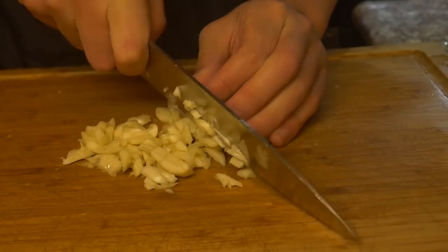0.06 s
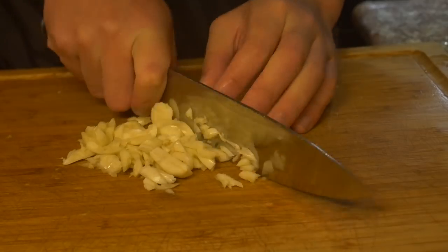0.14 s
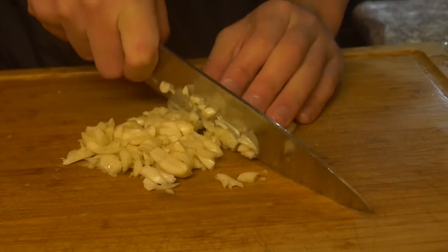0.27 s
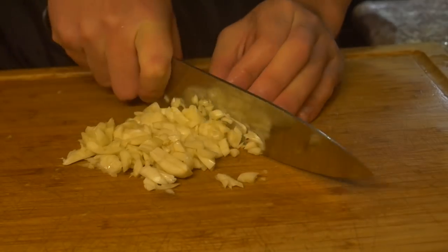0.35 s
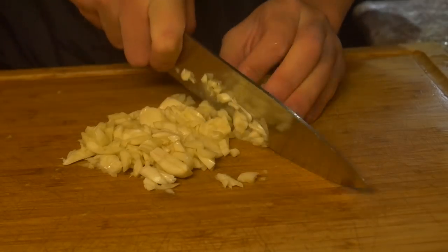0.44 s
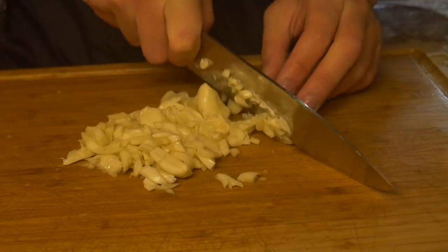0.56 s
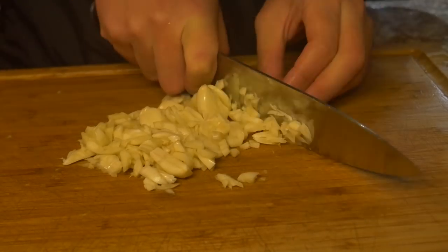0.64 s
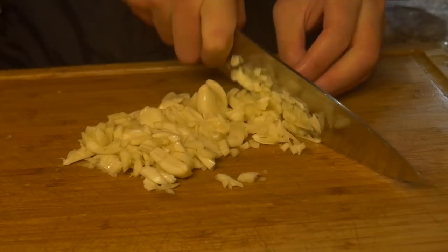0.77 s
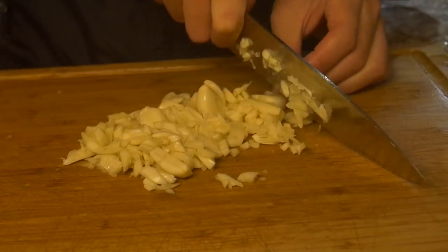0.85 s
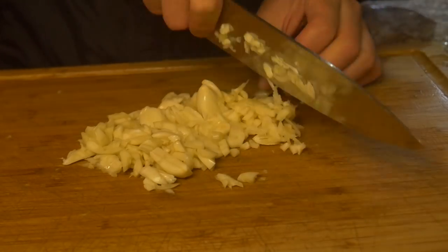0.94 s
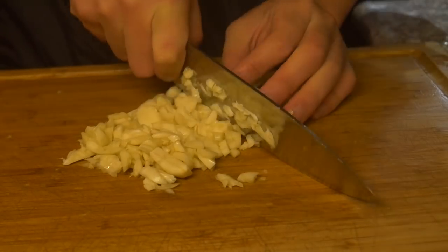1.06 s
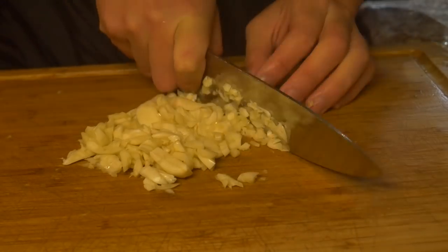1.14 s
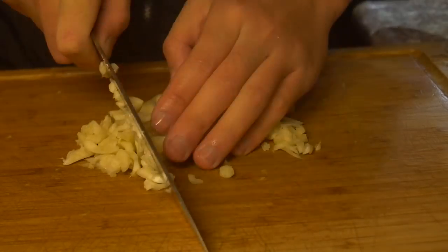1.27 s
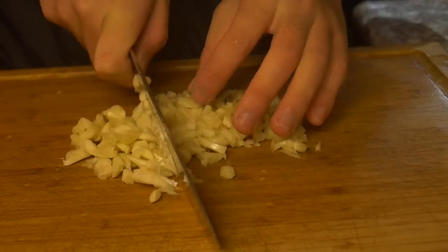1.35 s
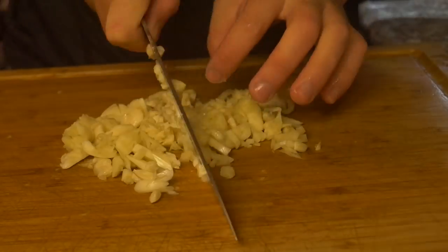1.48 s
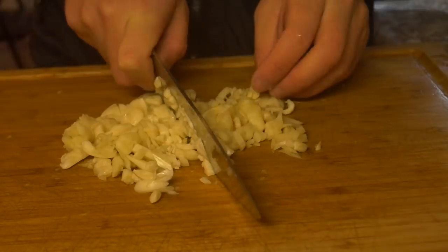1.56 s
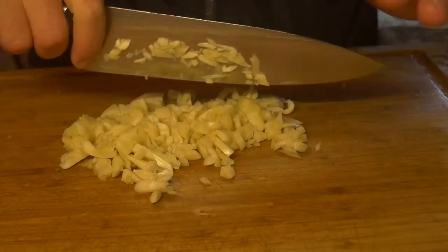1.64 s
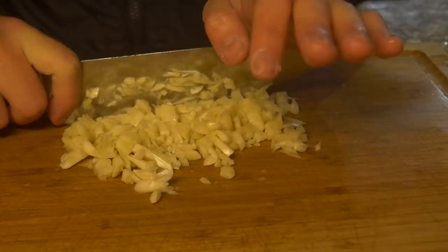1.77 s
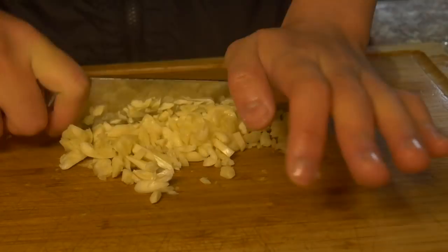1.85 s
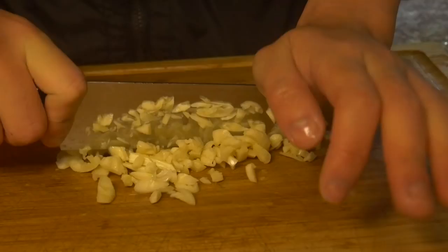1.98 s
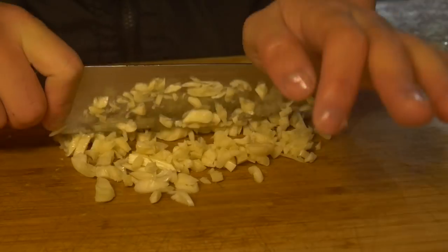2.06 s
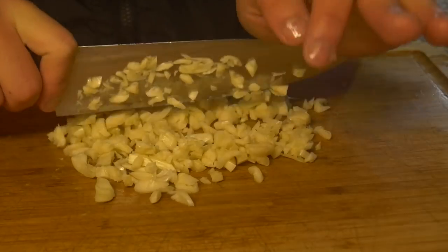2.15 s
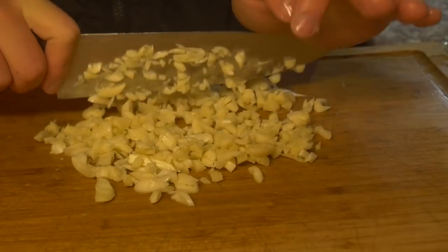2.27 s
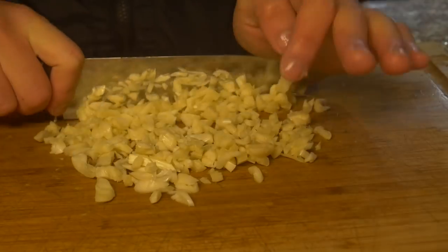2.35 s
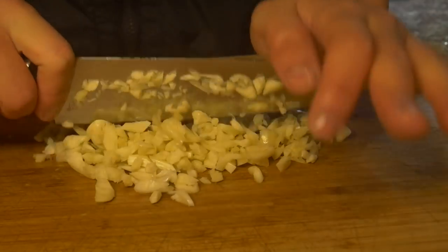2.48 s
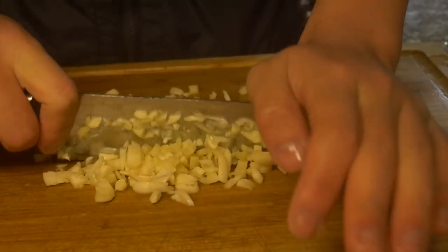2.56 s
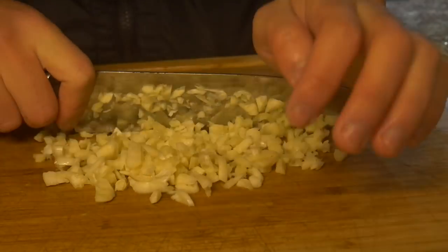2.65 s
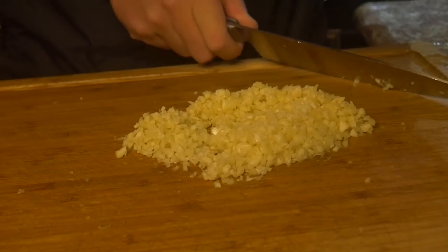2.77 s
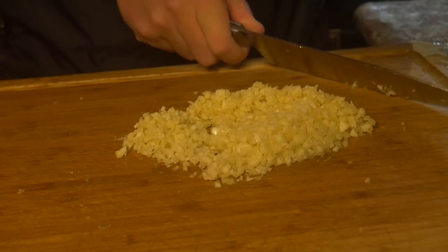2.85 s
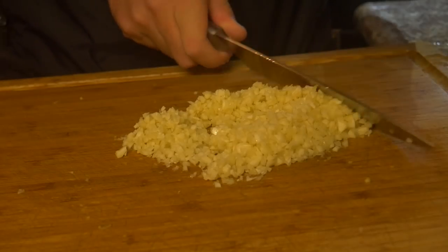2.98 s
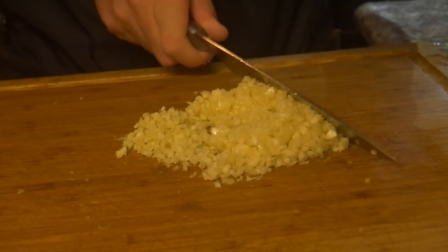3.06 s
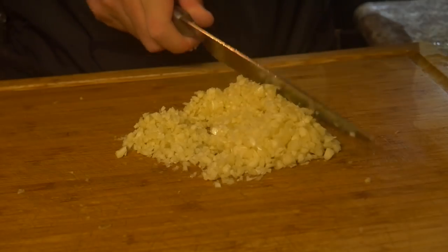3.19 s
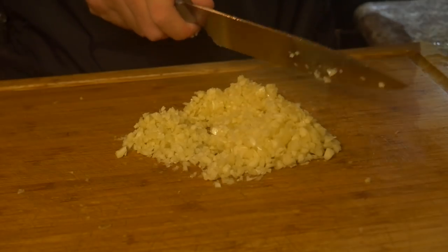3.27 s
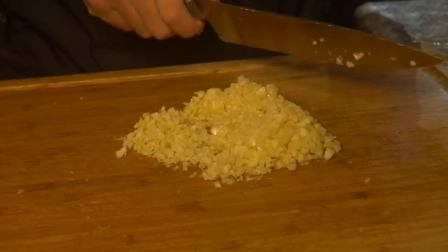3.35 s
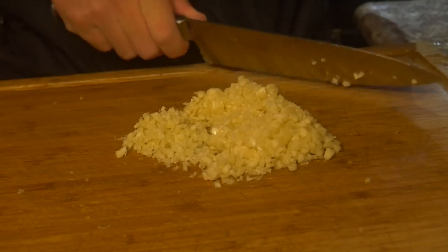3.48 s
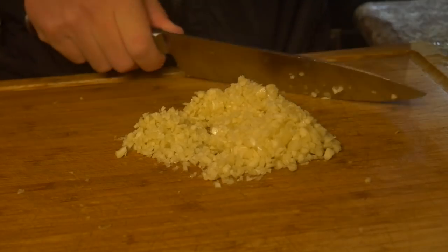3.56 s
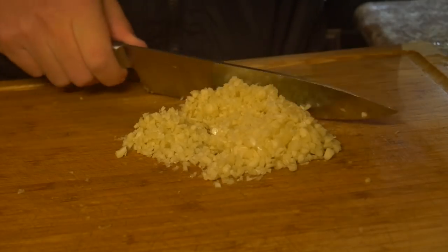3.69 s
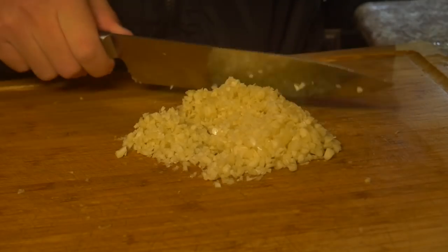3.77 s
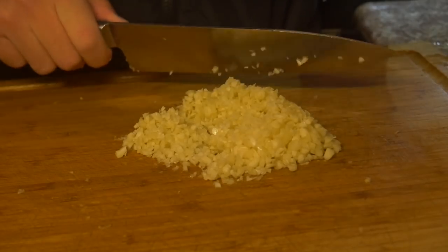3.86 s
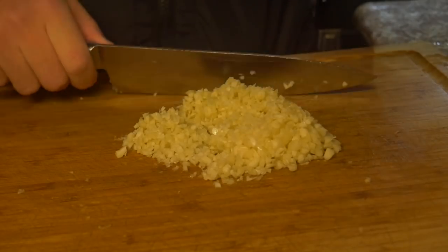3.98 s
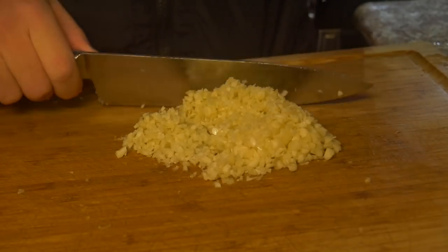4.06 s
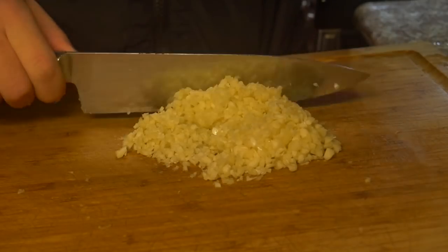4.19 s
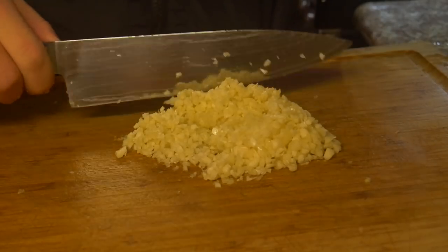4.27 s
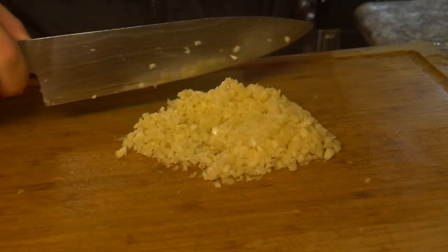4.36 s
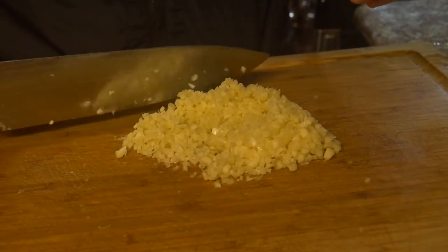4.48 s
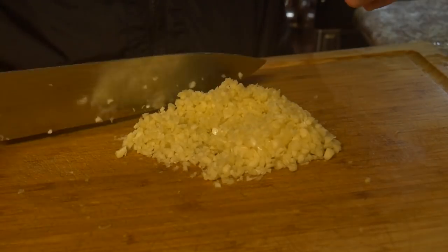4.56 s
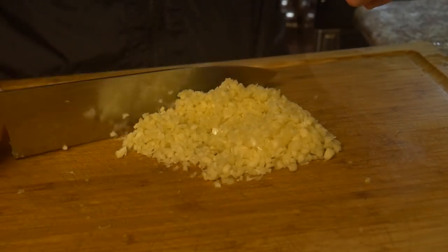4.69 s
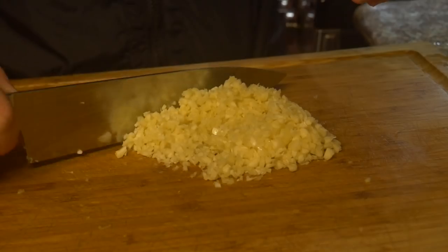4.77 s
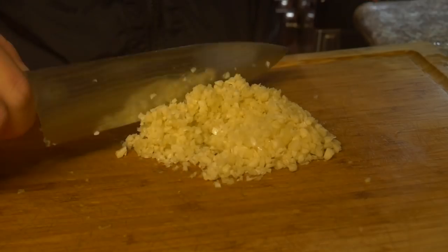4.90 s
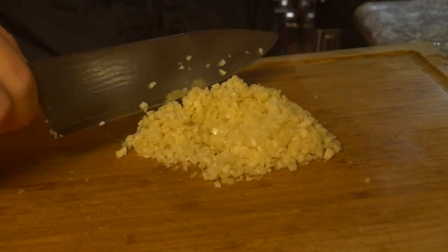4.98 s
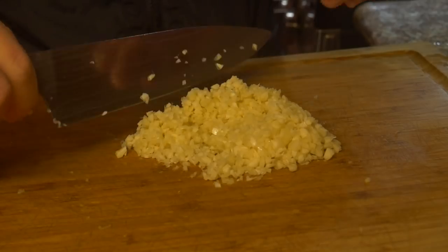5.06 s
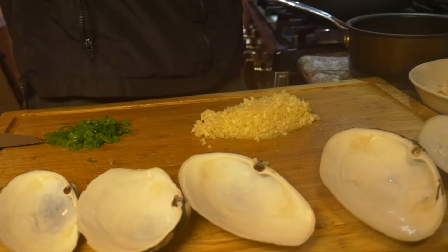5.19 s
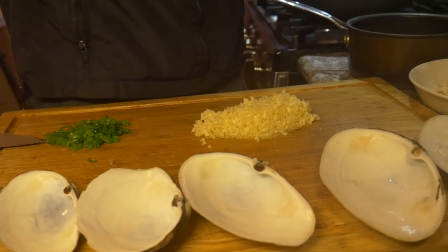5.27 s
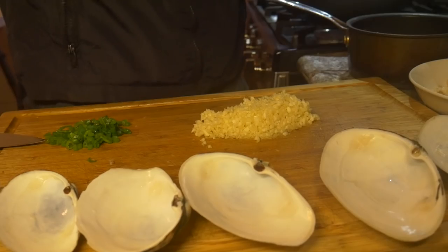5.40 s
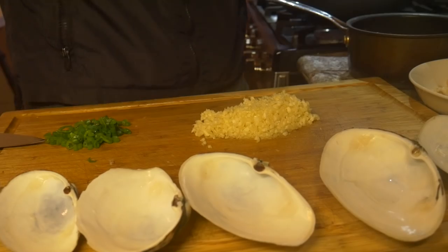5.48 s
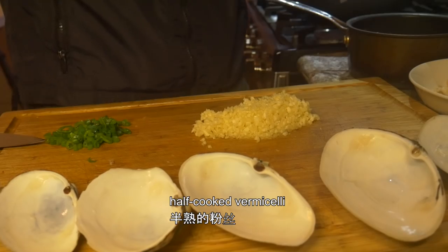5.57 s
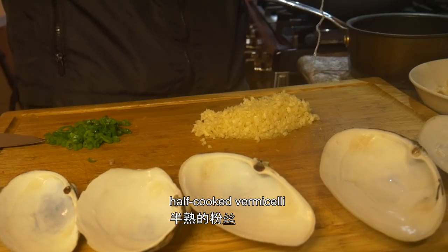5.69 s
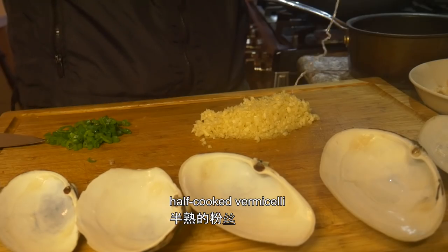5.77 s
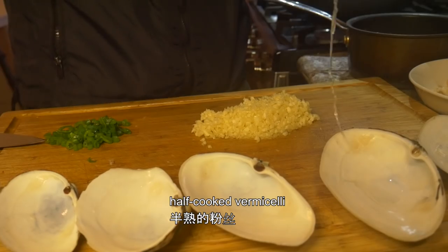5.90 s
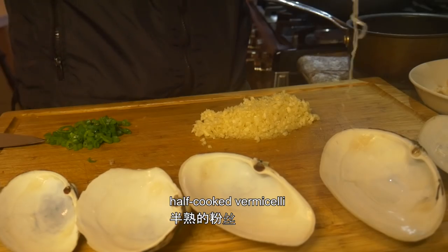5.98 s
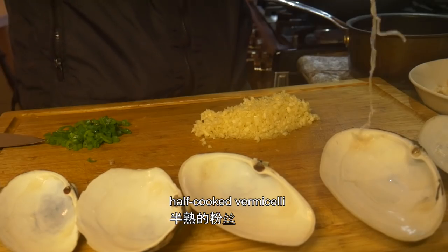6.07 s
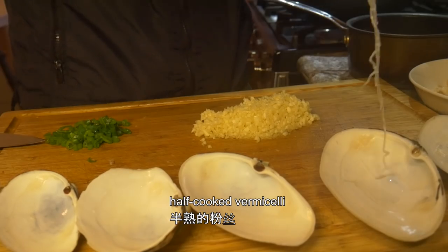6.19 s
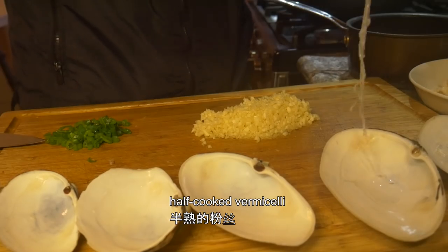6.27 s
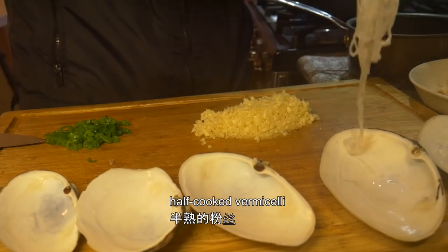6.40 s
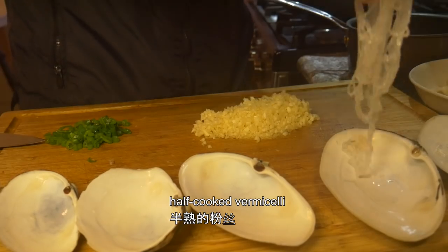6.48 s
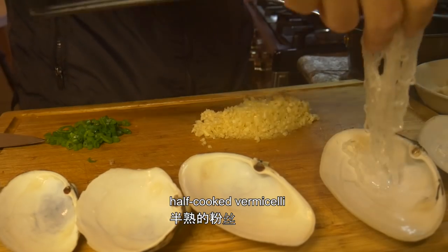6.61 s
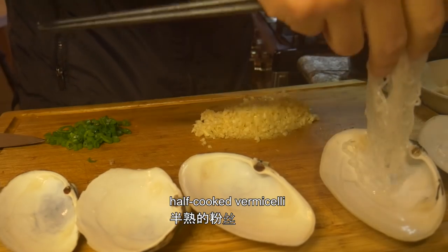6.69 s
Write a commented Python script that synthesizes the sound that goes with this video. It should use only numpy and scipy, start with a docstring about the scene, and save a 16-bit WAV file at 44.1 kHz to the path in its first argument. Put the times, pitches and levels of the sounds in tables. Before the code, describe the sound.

From 0 to 2.7 seconds, a knife chops garlic on a wooden board, greatly sped up: hard, bright, chirpy knocks about twenty a second, each with a crisp crunch and pitched far above normal, over hissy air and raised appliance hum. The run is fairly regular until 1.6, pauses briefly, then from 1.75 becomes denser, sharper and more uneven, some blows clipping. At 2.8 the sound drops to natural speed: a woody, hollow slap of the flat blade, then a gritty scrape with a metallic hum to about 3.15. A short scrape rasps at 3.65, a knock with a brief scrape comes at 4.05, and another knock at 4.72 with a faint gritty tail. Low rumble and hum sit beneath. From 5.2 the kitchen is quieter, with soft airy noise, faint swishes and barely audible dull touches near 6.25 and 6.4. Close, dry, nearly mono.

```python
"""In a kitchen, close by, a chef's knife minces garlic on a wooden board, played back eight times too fast:
every resonance sits three octaves up. Then, at natural speed, the blade taps the board and scrapes the
heap together; last comes a quieter kitchen with soft touches. Blows ring the modes of board and counter,
crunch and scrapes are random clicks through resonances, and the air is shaped noise with appliance hum."""
import sys
import numpy as np
from scipy import signal
from scipy.fft import rfft, irfft
from scipy.io import wavfile

SR = 44100
rng = np.random.default_rng(int(sys.argv[2]) if len(sys.argv) > 2 else 0)


def dump(signal):
    """Clip the signal to [-1, 1] and save it as 16-bit WAV at the path in sys.argv[1]."""
    limited = np.clip(np.atleast_2d(signal).T, -1, 1)
    pcm = np.round(limited * 32767).astype(np.int16)
    wavfile.write(sys.argv[1], SR, pcm)


N = 297234

SPEED = 8             # playback speed of the chopping
CUTOFF_HZ = 16100     # top of what is heard
THUMP_LAG_S = 0.0045  # natural speed: the counter swings up only after the blow

# ring of the board at natural speed: mode_hz, edge_blow_db, flat_blow_db, t60_s
BOARD_MODES = [(440, -1.5, -3, .08), (463, -8, -1, .115), (470, -18, -24, .38), (545, -10, -10, .06),
               (269, -8, -9, .12), (635, -8, -14, .06), (735, -12, -11, .08), (915, -16, -18, .06),
               (1140, -16, -24, .04), (1420, -18, -26, .03), (415, -6, -30, .06)]
# knock of the board on its feet, natural speed: mode_hz, edge_blow_db, flat_blow_db, t60_s
FEET_MODES = [(59.8, -6, -24.5, 0.12), (127.7, -5, -19, 0.3), (78.5, 5.5, -42, 0.18),
              (238, 10.5, -41, 0.046)]
# shape of the air noise up to 3 s, also of the chops' rumble: frequency_hz, level_db (per Hz)
FIRST_AIR_SHAPE = [(30, -13), (75, 4), (100, -5), (140, 9.5), (205, -16.5), (260, 9.5), (340, 0),
                   (480, -2.5), (600, -3), (1130, 0), (1700, 6), (3580, 3.5), (8300, -6), (16000, -10.5)]
# shape of the air noise from 3 s to 5.22 s, also of the taps' rumble: frequency_hz, level_db (per Hz)
SECOND_AIR_SHAPE = [(18, -42), (30, 16), (86, 13), (118, 10.5), (221, 7.5), (311, 12.5), (461, 0.5),
                    (540, -6), (702, -14), (760, -18), (988, -19.5), (1590, -31.5), (1910, -31.5),
                    (11400, -46), (16000, -50)]


def chops():
    """Garlic crunches under the falling edge, the edge hits, board and counter answer."""
    # fast chops; weight goes into board and counter: start_s, blow_db, blow_hz, crunch_db, weight_db
    chop_table = [(.001, -40, 3000, -42, -35), (0.0488, -13.5, 3480, -26.5, -29),
                  (0.1019, -15.5, 2780, -26, -29), (0.154, -16, 4520, -21.5, -30.5),
                  (0.208, -3, 3000, -25, -27.5), (0.2583, -4.5, 3580, -14.5, -28.5),
                  (0.3082, -5, 3400, -15.5, -28), (0.36, -6, 3320, -21, -28.5),
                  (.4087, -6.5, 2540, -17.5, -26.5), (0.4553, -13, 3400, -17.5, -28),
                  (0.5075, -7, 2570, -19, -28), (.5498, -26, 4070, -34, -48),
                  (0.561, -17.5, 2850, -22.5, -28.5), (0.6095, -3, 3300, -20.5, -27),
                  (0.6637, -9.5, 2150, -27, -27.5), (0.7082, -3, 2970, -25, -28),
                  (.751, -14, 4570, -23.5, -31.5), (0.795, -9.5, 1900, -27.5, -28),
                  (0.8401, -7, 2410, -27.5, -27.5), (.8866, -4, 3020, -26.5, -30),
                  (0.9288, -15, 4620, -21.5, -32.5), (0.9711, -6.5, 3080, -25, -30),
                  (1.025, 1.5, 5750, -28, -43), (1.0671, -3, 2740, -18.5, -28.5),
                  (1.115, -9, 2700, -25, -29.5), (1.161, -3.5, 3260, -19.5, -28),
                  (1.21, -2.5, 3300, -21.5, -29.5), (1.2726, -8, 4060, -48, -53.5),
                  (1.3319, -3.5, 5460, -25.5, -41), (1.383, -5.5, 4450, -25, -27.5),
                  (1.422, -21, 4750, -26.5, -35.5), (1.464, -14, 4700, -23, -32),
                  (1.5074, -4.5, 3530, -23, -27.5), (1.569, -13, 4900, -31.5, -40),
                  (1.6134, 1, 3780, -20.5, -30), (1.7492, -10, 3760, -29, -37),
                  (1.7627, -2.5, 2300, -19, -25), (1.7762, -5.5, 3450, -35, -61),
                  (1.7963, -6, 4990, -12, -57), (1.8181, -0.5, 2900, -31, -25),
                  (1.8594, 2.5, 4370, -26, -32), (1.8882, -1, 2400, -21, -28.5),
                  (1.9013, -6, 3140, -15, -58), (1.9163, -7, 4300, -20, -34.5),
                  (1.941, -0.5, 2500, -24, -23), (1.9536, -5.5, 3360, -38, -67.5),
                  (1.973, -8, 3760, -25, -38), (2.0328, 1, 4700, -22, -26), (2.0624, -6.5, 3900, -28, -29),
                  (2.0925, -23.5, 2780, -25, -35), (2.117, 0, 3760, -17.5, -24),
                  (2.1457, -18, 2810, -28, -36.5), (2.1727, -1, 4200, -20, -30),
                  (2.201, 1.5, 4700, -27, -28.5), (2.2315, -10.5, 4380, -21, -32),
                  (2.2604, -4.5, 4240, -21.5, -33.5), (2.2907, -8.5, 3360, -21, -27.5),
                  (2.318, -23, 5370, -22, -60), (2.3704, -6.5, 5000, -15, -37),
                  (2.3937, -19.5, 2710, -25, -29.5), (2.4151, 0, 5040, -19, -33),
                  (2.4389, -13, 4020, -30.5, -28), (2.4646, 4, 5040, -32.5, -26),
                  (2.489, -17, 5020, -21, -44.5), (2.5113, -1, 2900, -28, -25.5),
                  (2.5456, -22.5, 2960, -37, -34.5), (2.5705, -20.5, 4100, -25, -43),
                  (2.6024, -16.5, 3960, -22, -31.5), (2.6297, 2, 5500, -16.5, -25.5),
                  (2.6616, 8, 4900, -40.5, -37.5), (2.6927, -0.5, 4800, -18.5, -29.5)]
    # time the edge needs through a piece, before blow and weight scale it: time_s, duration_ms
    piece_table = [(0, 14), (.25, 7.3), (.6, 9.3), (1.6, 9.3), (1.9, 5.6), (2.7, 4.8)]
    # knock at full weight as the knife wanders over the board: time_s, level_db
    knock_curve = [(0, -20.5), (1.25, -21.5), (1.65, -24.5), (1.8, -29.5), (2.7, -32)]
    # counter modes at natural speed: mode_hz, level_db, t60_s
    counter_modes = [(36, -8, .35), (42.7, 0, 1.1)]
    start_s, blow_db, blow_hz, crunch_db, weight_db = np.transpose(chop_table)
    light_db = weight_db + 25   # negative for a chop lighter than full weight, -25 dB

    # a harder blow, or a lighter chop, gets through sooner
    quicker_db = 0.31 * np.minimum(light_db, 0) - 0.11 * (blow_db - np.median(blow_db))
    cut_ms = np.interp(start_s, *np.transpose(piece_table)) * from_db(quicker_db)
    crunch = squeeze(start_s, crunch_db, cut_ms) * garlic()

    click_db = -29 + blow_db - 0.79 * light_db   # a light chop bares the steel
    clicks = steel_clicks(start_s, click_db, t60=0.0012, low_hz=7040)
    edge = blows(start_s, blow_db, blow_hz, cycles=5)
    edge_board = np.delete(BOARD_MODES, 2, axis=1)
    board_ring = strike(edge_board, start_s, -12 + .75 * blow_db, SPEED, scatter_db=2.5)
    sharp = crunch + edge + clicks + board_ring

    knock_db = np.interp(start_s, *np.transpose(knock_curve)) + 1.7 * light_db
    edge_feet = np.delete(FEET_MODES, 2, axis=1)
    knocks = strike(edge_feet, start_s, knock_db, SPEED, scatter_db=1.5)
    body = sharp + from_db(-14.5) * kitchen(sharp, SPEED) + knocks
    body = signal.sosfilt(signal.butter(4, 50 * SPEED, "high", fs=SR, output="sos"), body)

    thumps = strike(counter_modes, start_s + THUMP_LAG_S / SPEED, weight_db, SPEED, scatter_db=1)
    # the narrow band makes each thump a slow push
    slow_push = signal.butter(3, [31 * SPEED, 52 * SPEED], "band", fs=SR, output="sos")
    thumps = signal.sosfilt(slow_push, thumps)

    # chops leave the counter rumbling
    rumble = dying_bursts(start_s, weight_db - 15.5, t60=0.25) * coloured(FIRST_AIR_SHAPE)[1]
    return body + thumps + rumble


def squeeze(start_s, crunch_db, cut_ms):
    """Strength of the crunch: it builds as the edge sinks in, fades after the blow, and jumps at each bite."""
    # edge first cracks a clove: start_s, crunch_db
    bite_table = [(0.0376, -45), (0.3472, -23), (0.3974, -20), (.8790, -20.5), (0.933, -38),
                  (1.1100, -16.5), (1.559, -25), (1.7460, -24), (1.7527, -26.5), (1.761, -46),
                  (1.7900, -25), (1.967, -45), (2.539, -28), (2.7194, -33)]
    strength = np.zeros(N)
    after = int(0.0062 * SR)
    for at_s, size, ms in zip(start_s, from_db(crunch_db), cut_ms):
        i = round(at_s * SR)
        n = int(np.clip(ms * SR / 1000, 2, i))
        strength[i - n:i] += size * np.linspace(.2, 1, n) ** 1.37
        strength[i:i + after] += size * np.linspace(1, 0, after) ** 2
    bite_s, bite_db = np.transpose(bite_table)
    return strength + dying_bursts(bite_s, bite_db, t60=0.017)


def garlic():
    """Random cracks of uneven size through three broad resonances."""
    cracks = grains(9000, 3.5)
    return resonate(cracks, [(2200, 430, 0.5), (4800, 1100, 8), (11470, 14000, -5.0)])  # Hz, width Hz, dB


def taps():
    """The blade comes down flat on the board; the walls and the counter answer."""
    # blade laid down (heel low, tip high), and soft touches: start_s, blow_db, blow_hz, click_db, ring_db
    tap_table = [(2.8199, -3, 441, -19, -10.5), (2.821, -1, 1600, -50, -54.5), (3.59, -34.5, 518, -32, -38),
                 (4.0410, 2, 560, -18.5, -13), (4.0393, -13.5, 1720, -23, -66),
                 (4.7186, -0.5, 518, -33, -12), (4.72, -17, 1880, -46, -27), (4.797, -29.5, 534, -63, -45),
                 (6.244, -36, 270, -69.5, -51), (6.386, -50.5, 302, -72, -61.5)]
    start_s, blow_db, blow_hz, click_db, ring_db = np.transpose(tap_table)
    clicks = steel_clicks(start_s + 0.0019, click_db, t60=0.006, low_hz=900)
    crack = signal.sosfilt(signal.butter(1, 2500, fs=SR, output="sos"), clicks)
    hit = blows(start_s, blow_db, blow_hz, cycles=5.0) + crack
    flat_modes = np.delete(BOARD_MODES + FEET_MODES, 1, axis=1)
    board_ring = strike(flat_modes, start_s + 0.00215, ring_db, 0.99, scatter_db=1)
    hit = hit + from_db(-22) * kitchen(hit, 1.0) + board_ring
    hit = signal.sosfilt(signal.butter(2, 90, "high", fs=SR, output="sos"), hit)

    # low rumble after a tap, set against the board ring
    rumble_strength = dying_bursts(start_s + THUMP_LAG_S, ring_db - 31, t60=1)
    return hit + rumble_strength * coloured(SECOND_AIR_SHAPE)[0]


def scrapes():
    """The edge drags over the grain: dense slips excite wood and steel, catching unevenly."""
    # grit level as the edge presses: three scrapes, then the faint gritty tail of the last tap:
    # time_s, level_db
    pressure_curves = [
        [(2.865, -49.5), (2.897, -37), (2.955, -29), (3.013, -29), (3.047, -25), (3.155, -54.5), (3.22, -81)],
        [(3.63, -64), (3.642, -30.5), (3.704, -25), (3.756, -47), (3.9, -76)],
        [(4.068, -49), (4.082, -43), (4.102, -36), (4.132, -33), (4.152, -48.5), (4.24, -61), (4.32, -77)],
        [(4.727, -57), (4.735, -49), (4.752, -52.5), (4.768, -59), (4.795, -58), (4.825, -69), (4.9, -77)],
    ]
    # strongest levels of the three scrapes, then of the tap's gritty tail:
    # board_rumble_db, low_hum_db, high_hum_db, steel_hiss_db
    strongest_table = [(-28, -56, -16, -34), (-28.5, -25, -38.5, -35), (-33, -30.5, -35.5, -43),
                       (-42, -42.5, -40.5, -54)]
    # share of the grit level's dB followed by: board_rumble, low_hum, high_hum, steel_hiss
    pressure_share = [0.699, 0.902, 1.298, 1.5]
    # resonances of the rumbling board: centre_hz, width_hz, level_db
    rumble_peaks = [(256, 33, 10), (454, 52, 11.5), (560, 140, -0.5)]
    # hum of the blade, a low and a high list: centre_hz, width_hz, level_db
    low_hum_peaks, high_hum_peaks = [(766, 68, 6)], [(919.7, 20, 2), (1026, 160, -28)]
    # gritty resonances of the edge on the grain: centre_hz, width_hz, level_db
    grit_peaks = [(1047, 70, 7), (1645, 215, 10), (2120, 154, 8.5), (2500, 50, 15), (2840, 270, 10.5),
                  (3760, 190, 6), (4560, 670, -3.5)]
    # bands of the steel hiss: centre_hz, width_hz, level_db
    steel_peaks = [(6100, 86, 5), (7080, 290, -3), (8050, 120, -2.5), (9320, 210, -5), (10500, 600, -7),
                   (11900, 930, -6), (12270, 470, -2), (13600, 190, -14), (14750, 500, -9.5)]
    catch_db = 2.5   # uneven catching of the edge

    level_curves = []
    for curve, top_db in zip(pressure_curves, strongest_table):
        peak_db = np.max(curve, axis=0)[1]
        level_curves.append([(s, *(np.array(top_db) + np.multiply(pressure_share, db - peak_db)), db)
                             for s, db in curve])
    rumble, low_hum, high_hum, hiss, grit = in_time(level_curves)

    slips = grains(2500, 1.9)
    # filtered twice, so the hiss gathers in narrow bands with deep gaps between
    narrow_peaks = [(hz, .6 * width_hz, 0) for hz, width_hz, _ in steel_peaks]
    steel = resonate(grains(12000, 1.9), narrow_peaks)
    wood = rumble * resonate(slips, rumble_peaks, catch_db) + grit * resonate(slips, grit_peaks, catch_db)
    blade = low_hum * resonate(slips, low_hum_peaks) + high_hum * resonate(slips, high_hum_peaks)
    return wood + blade + hiss * resonate(steel, steel_peaks, catch_db)


def swishes():
    """Faint swishes of handling: noise through broad resonances, each swelling and fading smoothly."""
    # swishes: centre_s, half_length_s, level_db
    swish_table = [(3.036, 0.49, -48), (3.598, 0.048, -48.5), (4.082, 0.081, -46), (4.533, 0.48, -56.5),
                   (5.115, 0.18, -54.5), (5.386, 0.26, -61), (5.664, 0.21, -53), (5.91, 0.11, -57.5),
                   (6.677, 0.28, -58)]
    # their resonances: centre_hz, width_hz, level_db
    swish_peaks = [(863, 140, -0.5), (1100, 100, 3), (1600, 790, -3), (2213, 1400, -4.5),
                   (3710, 1940, -9.5)]
    t = np.arange(N) / SR
    swell = np.zeros(N)
    for centre_s, half_s, db in swish_table:
        swell += from_db(db) * np.cos(np.pi / 2 * np.clip((t - centre_s) / half_s, -1, 1)) ** 2
    return swell * resonate(rng.standard_normal(N), swish_peaks, patchy_db=1.5)


def air():
    """Gently wavering kitchen noise of three successive colours; appliance hum lies under the first two."""
    # level of the air from each time on, before it wavers: start_s, bass_db, middle_db, treble_db
    level_table = [(0, -54.5, -58.5, -44.5), (1.75, -45, -54.5, -48), (2.747, -53.5, -53.5, -55.5),
                   (5.221, -59.5, -60.5, -58.5)]
    # shape of the air noise from 5.22 s on: frequency_hz, level_db (per Hz)
    last_air_shape = [(18, -23), (30, 3.5), (70, 8), (165, -6.5), (252, -1), (336, -5.5), (364, -11.5),
                      (449, 0.5), (526, -9.5), (962, -8.5), (1070, -10), (1460, -13.5), (1810, -11.5),
                      (11100, -29), (16000, -28)]
    # when the colour of the air changes: time_s
    change_s = (3, 5.22)
    # appliance hum at natural speed: line_hz, width_hz, level_db (rms)
    hum_lines = [(119.8, 1.5, -55), (204.4, .6, -64)]
    # gain of each hum line in the first part: gain_db
    first_gains = [-3, 9]
    t = np.arange(N) / SR
    from_s, *band_db = np.transpose(level_table)
    row = np.searchsorted(from_s, t, "right") - 1
    levels = from_db(band_db)[:, row] * [flicker(2.4, 1.5) for _ in band_db]

    part = np.searchsorted(change_s, t)
    out = np.zeros(N)
    for k, shape in enumerate((FIRST_AIR_SHAPE, SECOND_AIR_SHAPE, last_air_shape)):
        out += (part == k) * np.sum(levels * coloured(shape), axis=0)
    for (hz, width_hz, db), gain_db in zip(hum_lines, first_gains):
        noise = rng.standard_normal(N)
        raised_hum = resonate(noise, [(hz * SPEED, width_hz * SPEED, 0)])
        natural_hum = resonate(noise, [(hz, width_hz, 0)])
        out += (part == 0) * from_db(db + gain_db) * raised_hum
        out += (part == 1) * from_db(db) * natural_hum
    return out


def kitchen(x, speed):
    """Walls return a dense tail that dulls as it dies; faster playback shortens and brightens it."""
    t60_s, dull_hz = 0.4, 2500   # at natural speed
    t = np.arange(int(t60_s / speed * SR)) / SR * speed
    white = rng.standard_normal((2, len(t)))
    low_pass = signal.butter(1, min(dull_hz * speed, .4 * SR), fs=SR, output="sos")
    dull = signal.sosfilt(low_pass, white[0])
    bright = 0.1 * white[1] * from_db(-120 * t / t60_s)   # dies sooner than the dull part
    tail = (dull + bright) * from_db(-60 * t / t60_s) * (t > .006)
    return signal.oaconvolve(x, tail / np.sqrt(np.sum(tail ** 2)))[:N]


def blows(seconds, db, hz, cycles):
    """The blade meets the wood: about one full swing, then it falls by 60 dB in the given cycles."""
    out = np.zeros(N)
    for s, size, f in zip(seconds, from_db(db), hz):
        turns = np.arange(int(10 * SR / f)) * f / SR
        onset = np.minimum(.7 + turns, 1)
        decay = from_db(-60 * np.maximum(turns - .75, 0) / cycles)
        i = round(s * SR)
        out[i:i + len(turns)] += size * np.sin(2 * np.pi * turns) * onset * decay
    return out


def steel_clicks(seconds, db, t60, low_hz):
    """Bright noise that dies at once."""
    high_pass = signal.butter(2, low_hz, "high", fs=SR, output="sos")
    return dying_bursts(seconds, db, t60) * rms_one(signal.sosfilt(high_pass, rng.standard_normal(N)))


def strike(modes, seconds, db, speed, scatter_db):
    """Every blow rings every mode at its own strength, neighbours in opposite sense.

    Faster playback raises and shortens the modes."""
    scatter = scatter_db * rng.standard_normal((len(seconds), len(modes)))
    out = np.zeros(N)
    for k, (hz, mode_db, t60) in enumerate(modes):
        if hz * speed < CUTOFF_HZ:
            sizes = (-1) ** k * from_db(db + mode_db + scatter[:, k])
            out += ring(clicks_at(seconds, sizes), hz * speed, t60 / speed)
    return out


def ring(clicks, hz, t60):
    """A unit click sets a decaying sine of starting height 1 ringing."""
    r, w = from_db(-60 / (t60 * SR)), 2 * np.pi * hz / SR
    return signal.lfilter([0, np.sin(w)], [1, -2 * r * np.cos(w), r * r], clicks)


def dying_bursts(seconds, db, t60):
    """Envelope that jumps at each time and falls by 60 dB in t60 seconds."""
    return signal.lfilter([1], [1, -from_db(-60 / (t60 * SR))], clicks_at(seconds, from_db(db)))


def clicks_at(seconds, sizes):
    """Train of single-sample clicks over a vanishingly small floor."""
    train = np.full(N, 1e-18)
    np.add.at(train, np.round(np.asarray(seconds) * SR).astype(int), sizes)
    return train


def grains(per_s, spread_db):
    """Random clicks of uneven size and sign; rms 1."""
    size_db = spread_db * np.minimum(rng.exponential(1, N), 4)
    sizes = from_db(size_db) * rng.choice([-1, 1], N)
    return rms_one(sizes * (rng.random(N) < per_s / SR))


def resonate(x, peaks, patchy_db=0):
    """Parallel resonances with alternating signs, each flickering on its own if patchy; rms 1."""
    out = 0
    for k, (hz, width_hz, db) in enumerate(peaks):
        r = np.exp(-np.pi * width_hz / SR)
        band = signal.lfilter([1, 0, -1], [1, -2 * r * np.cos(2 * np.pi * hz / SR), r * r], x)
        gain = flicker(45, patchy_db) if patchy_db else 1
        out = out + (-1) ** k * from_db(db) * (1 - r * r) * band * gain
    return rms_one(out)


def coloured(shape):
    """Noise of the given spectral shape as bass, middle and treble, each rms 1."""
    hz = np.maximum(np.arange(N // 2 + 1) * SR / N, 1)
    at_hz, db = np.transpose(shape)
    bins = rfft(rng.standard_normal(N)) * from_db(np.interp(np.log(hz), np.log(at_hz), db))
    bass, treble = 1 / (1 + (hz / 200) ** 8), 1 / (1 + (800 / hz) ** 8)
    middle = np.abs(1 - bass - treble)
    return np.array([rms_one(irfft(bins * np.sqrt(share), N)) for share in (bass, middle, treble)])


def flicker(per_s, db):
    """Gain that wanders by the given dB about per_s times a second."""
    knots = rng.standard_normal(int(N / SR * 200) + 2)
    return from_db(db * np.interp(np.arange(N) / SR * min(per_s, 200), np.arange(len(knots)), knots))


def in_time(tables):
    """Gains of dB curves sample by sample; each table fades to silence within 10 ms outside its span."""
    t, out = np.arange(N) / SR, 0
    for s, *columns in map(np.transpose, tables):
        inside = np.interp(t, [s[0] - .01, s[0], s[-1], s[-1] + .01], [0, 1, 1, 0])
        out = out + inside * from_db([np.interp(t, s, c) for c in columns])
    return out


def from_db(db):
    """Decibels to amplitude ratio."""
    return 10 ** (np.asarray(db, float) / 20)


def rms_one(x):
    """Scale to an rms of 1."""
    return x / np.sqrt(np.mean(x ** 2) + 1e-20)


def scene():
    """Nearly mono: a very faint filtered, noise-smeared copy sets the channels slightly apart."""
    # level of the smeared copy against the sound itself: frequency_hz, level_db
    smear_curve = [(60, -29.5), (110, -35), (200, -34), (380, -53), (700, -43.5), (1290, -45), (2380, -53),
                   (4400, -54.5), (8120, -43), (15000, -28.5)]
    drag = scrapes()
    drag_room = from_db(-29.5) * kitchen(drag, 1)
    mid = chops() + taps() + drag + drag_room + swishes() + air()

    hz = np.maximum(np.arange(N // 2 + 1) * SR / N, 1)
    at_hz, db = np.transpose(smear_curve)
    smear_gain = from_db(np.interp(np.log(hz), np.log(at_hz), db))
    smear = rms_one(rng.standard_normal(400)) / 20   # 9 ms of noise, total energy 1
    side = irfft(rfft(mid) * rfft(smear, N) * smear_gain, N)
    return np.array([mid + side, mid - side])


def record(dry):
    """The loudest blows clip at full scale; the top is cut."""
    low_pass = signal.cheby2(12, 60, CUTOFF_HZ * 1.03, fs=SR, output="sos")
    return np.clip(signal.sosfilt(low_pass, np.clip(dry, -1, 1)), -1, 1)


dry = scene()
out = record(dry)
dump(out)
```